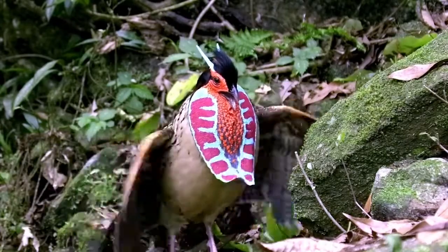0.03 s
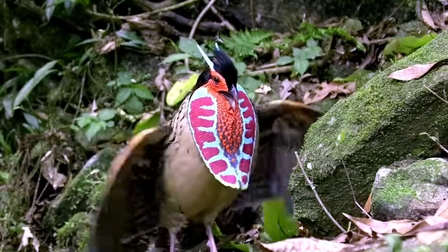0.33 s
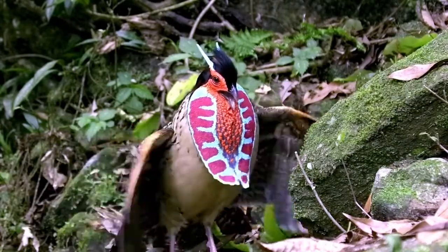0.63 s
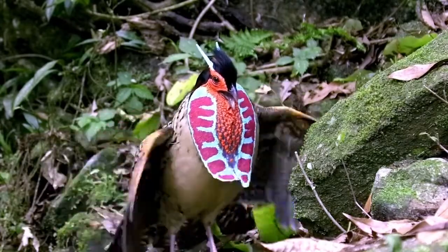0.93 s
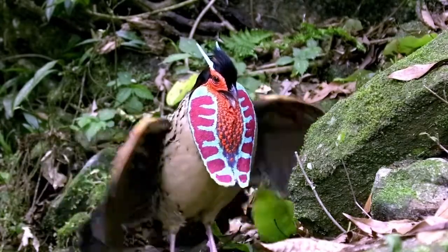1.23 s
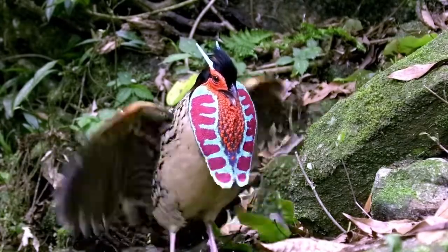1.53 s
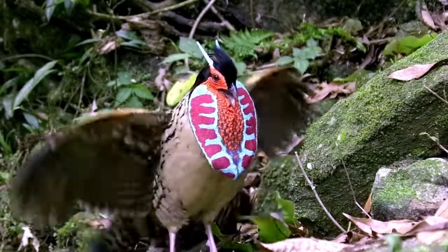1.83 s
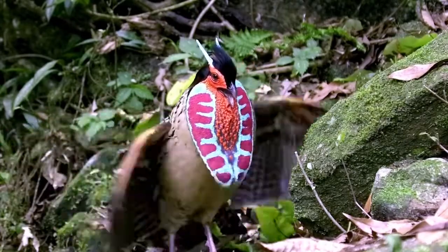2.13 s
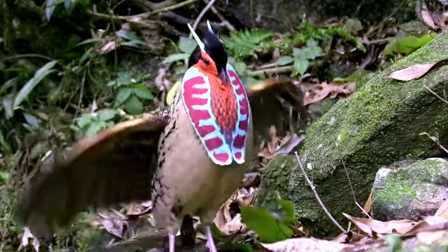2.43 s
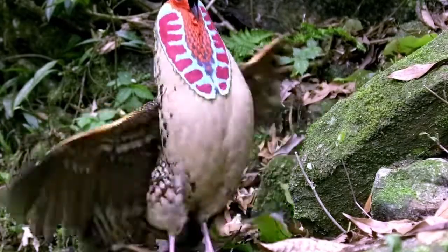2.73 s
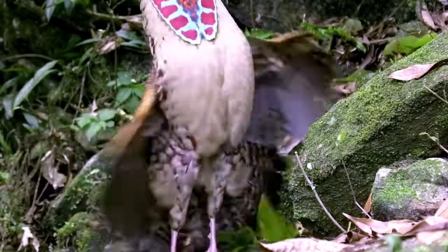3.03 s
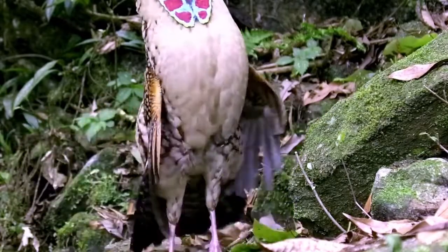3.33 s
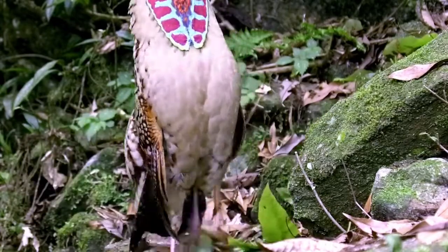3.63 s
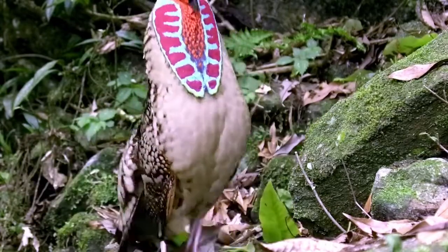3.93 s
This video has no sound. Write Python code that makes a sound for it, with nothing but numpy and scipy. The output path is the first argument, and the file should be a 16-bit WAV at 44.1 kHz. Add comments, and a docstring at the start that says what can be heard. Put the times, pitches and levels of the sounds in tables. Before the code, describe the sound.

Sharp clicks and wing beats from a displaying pheasant, followed by rustling and a hiss.

```python
"""A sharp click and a swishing, fluttering wing stroke sound close by: a pheasant is displaying.
Nine more beats follow, each led by a soft tick. Short bursts ringing its throat make the ticks and
clicks; feathers and puffs of air make the strokes. Then it rears up with shivering wings, hisses
and scuffs through dry leaves, while quills and twigs snap. Small birds call far off among the
trees, over quiet foliage and a low rumble of moving air."""
import sys
import numpy as np
from scipy import signal
from scipy.fft import rfft, irfft
from scipy.io import wavfile

SR = 44100
rng = np.random.default_rng(int(sys.argv[2]) if len(sys.argv) > 2 else 0)


def waveform_to_disk(signal):
    """Save audio, clipped to [-1, 1], as 16-bit WAV at the path in sys.argv[1]."""
    frames = np.transpose(np.atleast_2d(signal))
    scaled = np.clip(frames, -1, 1) * 32767
    samples = np.round(scaled).astype(np.int16)
    wavfile.write(sys.argv[1], SR, samples)


N = 176400
T = np.arange(N) / SR
FREQS = np.arange(N // 2 + 1) * SR / N + 1e-3

# The ten beats of the display (time [s], click level [dB], click rise [s], click fall [s],
# throat tuning [ratio], swish level [dB], flutter level [dB])
BEATS = [(.003, -9.5, 0.0049, 0.0076, 1.36, -2, -0.5), (0.3017, -0.5, 0.0025, 0.0036, 0.97, 0.5, 2.5),
         (.6003, 1, 0.0018, 0.0044, 0.99, 0.5, -0.5), (0.8764, -0.5, 0.004, 0.0032, 0.98, -2.5, -2.5),
         (1.1459, 0, 0.0018, 0.0067, 0.99, -2.5, -0.5), (1.3979, -0.5, 0.0022, 0.0064, 0.99, -3, -1),
         (1.639, -0.5, 0.0039, 0.0051, 1.017, -2.5, -2), (1.877, 2, 0.0027, 0.0026, 0.991, -2.5, 1.5),
         (2.1015, -0.5, 0.0028, 0.0044, 1.03, 0, 1), (2.3313, -4.5, 0.0053, 0.0068, 0.92, -2.5, 2.5)]
# Stereo width of close and of spread-out sounds (frequency [Hz], side compared with middle [dB])
NARROW = [(100, -67.5), (2200, -65), (4200, -14.5), (5600, -2.5), (7400, -2), (8400, -19), (11500, -12),
          (13500, -2.5)]
WIDE = [(100, -10.5), (1000, -16.5), (3000, -13.5), (6000, 0.5), (10000, -15.5), (14000, 0)]
BIRD_PAN_DB, LEAF_PAN_DB = -2, -0.9  # left minus right


def clicks():
    """Short rough bursts ring the throat: a dull tick within a faint scrape, then the sharp click."""
    # Soft ticks ahead of the clicks (time [s], level [dB])
    ticks = [(0.2537, -2), (0.554, -1), (.831, -1.5), (1.1015, -3.5), (1.355, 0.5), (1.594, 0), (1.833, -2),
             (2.061, -1), (2.291, -3)]
    burst = stereo(grains(16000, 1.0), NARROW, BIRD_PAN_DB)
    sharp = sum(undb(db) * shade(burst * swell(at, rise, fall), throat(tuning))
                for at, db, rise, fall, tuning, _, _ in BEATS)
    tick_level = sum(undb(db) * (swell(at, 0.0055, 0.0019) + undb(-9) * swell(at, 0.018, 0.018))
                     for at, db in ticks)
    tick_bursts = stereo(grains(5000, 1.2), NARROW, BIRD_PAN_DB) * tick_level
    dull = shade(tick_bursts, throat(0.95) * lowpass(6750, 4))
    direct = undb(-10.5) * sharp + undb(-23.5) * dull
    return direct + undb(-13) * tree_echo(direct.mean(0), fade_s=0.31)


def throat(tuning):
    """Gain per frequency of the throat, which rings at a few pitches, all multiplied by tuning."""
    # Pitches at which the throat rings (frequency [Hz], width [Hz], level [dB])
    resonances = [(1010, 680, -23.5), (2312, 430, -3.5), (3440, 230, -1), (4277, 330, 2.5), (5330, 300, -2),
                  (6470, 600, -3), (7540, 230, -1.5), (9940, 390, -1.5), (11900, 1000, -13.5)]
    f = FREQS / tuning
    return sum(undb(db) / (1 + ((f / hz - hz / f) * hz / width) ** 2) for hz, width, db in resonances)


def wing_strokes():
    """With every click the wings sweep down: a crackly swish, and a low flutter that slows."""
    # Tone of the swishing feathers (frequency [Hz], level [dB])
    swish_tone = [(240, -58), (400, -17.5), (586, -26.5), (683, -21.5), (942, -16.5), (1100, -14.5),
                  (1560, -18.5), (2430, -7), (2880, -9.5), (3300, -6), (4220, -5), (4700, -7.5), (7100, -4),
                  (9950, -2), (12700, -5), (14600, -2), (15500, -9)]
    flutter_hz, slowing_hz_per_s = 100.15, 260
    # The second swell keeps the swish from starting ahead of its click.
    swish = sum(undb(db) * swell(at + 0.008, 0.0091, 0.028, hold=0.0077) * swell(at, rise, 0.028, hold=1)
                for at, _, rise, *_, db, _ in BEATS)
    crackle = stereo(grains(14000, 1.5), NARROW, BIRD_PAN_DB)
    feathers = shade(crackle * swish * undb(1.3 * wander(150)), colour(swish_tone))
    starts = np.array(BEATS)[:, 0]
    since_beat = T - starts[np.maximum(np.searchsorted(starts, T) - 1, 0)]
    puff_hz = np.maximum(flutter_hz - slowing_hz_per_s * since_beat, flutter_hz / 2)
    push = sum(undb(db) * swell(at + 0.021, 0.017, 0.039) for at, *_, db in BEATS)
    air = undb(-31.5) * push * flutter(puff_hz, noise_share=0.7)
    return undb(-17) * feathers + air + undb(-11) * tree_echo(air.mean(0), fade_s=0.39)


def flutter(hz, noise_share):
    """Bending flight feathers let out uneven puffs of air, about hz times a second."""
    # Tone of the air pushed by the wings (frequency [Hz], level [dB])
    air_tone = [(25, 5), (60, -5.5), (90, 0), (125, 4), (175, 2.5), (250, -9), (350, -12.5), (500, -18.5),
                (800, -54), (2000, -60)]
    uneven_hz = hz * np.exp(0.0691 * wander(60))
    cycle = np.floor(np.cumsum(uneven_hz) / SR)
    puffs = np.diff(cycle, prepend=0) * undb(2 * wander(70))
    air = unit(puffs - puffs.mean()) + noise_share * stereo(white(), NARROW)
    return unit(shade(air, colour(air_tone)))


def rearing():
    """The wings shiver as the bird rises: feathers rustle, air rushes and buffets the microphone."""
    # Loudness as the bird rises (time [s], rustle [dB], rush [dB], shiver [dB])
    movement = [(2.4, -37.5, -58, -56), (2.462, -48, -56, -72), (2.59, -33.5, -42, -36.5),
                (2.62, -28, -41, -43), (2.674, -36.5, -48.5, -44.5), (2.786, -36, -38, -39),
                (2.84, -27.5, -34.5, -29.5), (2.89, -30.5, -35, -40), (2.978, -27.5, -33.5, -31.5),
                (2.996, -27, -22, -36), (3.026, -19, -29.5, -25.5), (3.064, -26.5, -31, -34.5),
                (3.134, -24.5, -32, -26), (3.158, -19, -23, -29.5), (3.174, -23.5, -35, -30),
                (3.34, -29.5, -38, -37.5), (3.404, -34.5, -51, -93), (3.42, -33.5, -62, -69)]
    # Tones of the rustling feathers and the rushing air (frequency [Hz], level [dB])
    rustle_tone = [(880, -32), (1500, -1), (1820, -7.5), (2590, 2), (3000, -5), (4230, -2.5), (4940, -5),
                   (6370, -6.5), (7600, -6), (8210, -8), (13100, -8.5), (15100, -10.5), (15500, -27)]
    rush_tone = [(150, -11.5), (300, 5.5), (600, -4), (950, 3.5), (1400, -2.5), (2200, -33), (5000, -23.5)]
    times, *levels = np.array(movement).T
    fade = swell(times[0], 0.06, 0.023, hold=times[-1] - times[0])
    rustle, rush, shiver = (fade * undb(np.interp(T, times, db)) for db in levels)
    crackle = stereo(grains(9000, 1.1), NARROW, pan_db=-1.5) * rustle * undb(0.71 * wander(82))
    feathers = shade(crackle, colour(rustle_tone) * highpass(1300, 4))
    air = shade(stereo(white(), NARROW) * rush, colour(rush_tone) * highpass(120, 2))
    buffet = undb(2) * shade(stereo(white(), WIDE), lowpass(27, 4))
    feathers = undb(1.5) * rock_echo(feathers)
    puffs = undb(-1) * flutter(hz=79.4, noise_share=1.0)
    return feathers + air + shiver * (puffs + buffet)


def hiss():
    """A long hiss with a steady tone grows while the bird stands tall."""
    # Loudness of the hiss (time [s], level [dB])
    loudness = [(2.5, -69.5), (2.75, -40), (3.0, -54), (3.25, -46), (3.42, -30.5), (3.6, -29.5), (3.7, -24),
                (3.82, -23), (4, -23.5)]
    # Tone of the hiss (frequency [Hz], level [dB])
    hiss_tone = [(350, -31.5), (600, -21.5), (678, -19.5), (902, -10), (1220, -17), (1390, -15),
                 (1510, -15), (1830, -6.5), (2250, -8), (2470, 1.5), (2570, 1), (3030, -12), (3610, 2.5),
                 (3920, -6.5), (4310, -3.5), (4750, -10.5), (5080, -12.5), (5660, -10), (6150, -5.5),
                 (7640, -11), (8180, -18), (9500, -9.5), (11000, -20.5), (14300, -18), (15500, -25)]
    times, db = np.array(loudness).T
    fade_in = np.clip((T - times[0]) / 0.079, 0, 1)
    level = undb(np.interp(T, times, db) + 0.5 * wander(25.17)) * fade_in
    return level * rock_echo(shade(stereo(white(), WIDE, pan_db=-7), colour(hiss_tone)))


def scuffs():
    """Feet and tail drag through dry leaves in crackling bursts."""
    # Drags through the leaves (time [s], level [dB], rise [s], fall [s])
    drags = [(3.732, -17, 0.034, 0.074), (3.764, -22.5, 0.02, 0.012), (3.9, -13.5, 0.027, 0.043),
             (3.976, -23, 0.032, 0.091)]
    # Tone of dry leaves (frequency [Hz], level [dB])
    leaf_tone = [(240, -33), (400, -14), (738, -15.5), (1030, -9), (1150, -12), (1490, -8.5), (1660, -9.5),
                 (2430, -1), (3010, -3.5), (4290, -3.5), (5390, -4.5), (9650, -5.5), (14100, -6),
                 (15500, -10)]
    level = sum(undb(db) * swell(at, rise, fall) for at, db, rise, fall in drags)
    return shade(stereo(grains(9000, 1.4), WIDE, LEAF_PAN_DB) * level, colour(leaf_tone))


def snaps():
    """Quills flick and dry twigs crack as the bird moves."""
    # Single snaps (time [s], level [dB])
    cracks = [(2.582, -21.5), (2.616, -25.5), (2.957, -21), (3.028, -22), (3.1, -31), (3.156, -19),
              (3.76, -9.5), (3.7666, -9.5), (3.901, -13)]
    # Tone of a snap (frequency [Hz], level [dB])
    snap_tone = [(200, -10.5), (600, -6.5), (1000, 2.5), (1600, -2.5), (2500, 3.5), (6000, -1.5),
                 (10000, -17), (15500, -17)]
    level = sum(undb(db) * swell(at, 0.001, 0.002) for at, db in cracks)
    return shade(stereo(grains(12000, 3.6), NARROW, LEAF_PAN_DB) * level, colour(snap_tone))


def far_birds():
    """Small birds call far off: a fast pitch wobble makes them hoarse, and the forest blurs them."""
    # Calls (time [s], length [s], start pitch [Hz], end pitch [Hz], wobble [share of pitch],
    # level [dB], direct sound compared with echo [dB])
    calls = [(0.776, 0.11, 3800, 3700, 0.059, -30.5, -17), (0.891, 0.053, 1031, 678, 0.0652, -31.5, 1.5),
             (0.946, 0.072, 3600, 3714, 0.15, -32.5, -6), (1.514, 0.13, 3750, 3750, 0.084, -29.5, -12),
             (1.894, .16, 3610, 3667, 0.067, -29, -4), (2.22, 0.097, 2473, 2464, 0.036, -24, -9),
             (2.399, 0.092, 2940, 3190, 0.11, -24.5, -5), (2.517, 0.108, 3716, 3793, 0.074, -25.5, -8)]
    direct, scattered = 0, 0
    wobble = wander(421.5)
    for at, length, start_hz, end_hz, share, db, direct_db in calls:
        progress = np.clip((T - at) / length, 0, 1)
        hz = (start_hz + (end_hz - start_hz) * progress) * (1 + share * wobble)
        level = undb(db) * np.sqrt(abs(np.sin(np.pi * progress)))
        call = level * np.sin(2 * np.pi * np.cumsum(hz) / SR)
        direct += undb(direct_db) * call
        scattered += call
    return direct + tree_echo(scattered, fade_s=0.64)


def forest():
    """Foliage rustles quietly over a low rumble of moving air."""
    # Tone of the foliage (frequency [Hz], level [dB])
    foliage_tone = [(180, -9), (300, 1.5), (411, -4), (708, -5.5), (794, -8), (1490, -3.5), (1750, -8),
                    (4960, -10), (11500, -9.5), (15500, -10)]
    foliage = undb(-48.5 + wander(2.65)) * shade(stereo(white(), WIDE), colour(foliage_tone))
    rumble = undb(-47.5) * shade(stereo(white(), WIDE), lowpass(34.7, 2))
    return foliage + rumble


def tree_echo(x, fade_s):
    """Trunks and ground scatter the sound into an echo that drops 60 dB in fade_s seconds."""
    decay = undb(np.maximum(-60 * T / fade_s, -200))
    tail = (stereo(white(), WIDE) * decay)[:, :SR]
    tail /= np.sqrt(np.sum(tail ** 2) / 2)
    return signal.fftconvolve(np.atleast_2d(x), tail, axes=1)[:, :N]


def rock_echo(x):
    """Quick echoes from the ground and boulders mix with the sound and change its tone."""
    fade_s, echo_gain = 0.045, undb(-4)
    age = T[T < 0.1]
    tail = rng.standard_normal(len(age)) * undb(-60 * age / fade_s)
    echoes = signal.fftconvolve(x, tail[None] / np.linalg.norm(tail), axes=1)[:, :N]
    return (x + echo_gain * echoes) / np.hypot(1, echo_gain)


def undb(db):
    """Turn decibels into a gain to multiply by."""
    return np.exp(np.asarray(db) * np.log(10) / 20)


def unit(x):
    """Scale a signal to an average power of 1."""
    return x / np.sqrt(np.mean(x ** 2))


def colour(points):
    """Join (frequency [Hz], level [dB]) points into a gain at every frequency."""
    hz, db = np.array(points, float).T
    return undb(np.interp(np.log(FREQS), np.log(hz), db))


def lowpass(hz, steepness):
    """Gains that turn down frequencies above hz."""
    return 1 / (1 + (FREQS / hz) ** steepness)


def highpass(hz, steepness):
    """Gains that turn down frequencies below hz."""
    return 1 / (1 + (hz / FREQS) ** steepness)


def shade(x, gain):
    """Filter by a gain per frequency, scaled so that white noise keeps its power."""
    return irfft(rfft(x) * gain / np.sqrt(np.mean(abs(gain) ** 2)), N)


def stereo(pair, width, pan_db=0):
    """Mix two unrelated signals into left and right, which sound alike where the width is small."""
    spread = colour(width)
    middle, side = rfft(pair) / np.sqrt(1 + spread ** 2)
    left_right = irfft(np.array([middle + spread * side, middle - spread * side]), N)
    return left_right * undb(np.array([[pan_db], [-pan_db]]) / 2)


def white():
    """Two unrelated white noises."""
    return rng.standard_normal((2, N))


def grains(rate, spread_db):
    """A crackle of tiny snaps of unequal size, about rate of them a second."""
    hits = rng.random(N) < rate / SR
    return unit(white() * hits * undb(spread_db * np.minimum(rng.exponential(size=N), 2 * np.pi)))


def wander(rate):
    """A random drift of roughly plus or minus 1, heading for a new value rate times a second."""
    return np.interp(T * rate, np.arange(8192), rng.standard_normal(8192)) * np.sqrt(3 / 2)


def swell(at, rise, fall, hold=0):
    """A level that rises in a bell curve to 1 at time at, holds, then dies away (all in seconds)."""
    before = (np.minimum(T - at, 0) / rise) ** 2
    after = np.maximum(T - at - hold, 0) / fall
    return np.exp(-np.minimum(before + after, 50))


def scene():
    """The pheasant's display in its forest."""
    return clicks() + wing_strokes() + rearing() + hiss() + scuffs() + snaps() + far_birds() + forest()


def record(dry):
    """Two slightly unlike microphones; the recorder sits off zero, clips and cuts the highest treble."""
    # How the microphones differ (frequency [Hz], right minus left [dB])
    mic_balance = [(200, -1), (4000, -1.64), (5300, 1), (6600, -1.5), (11800, -1.5), (13200, 3.5),
                   (15500, 2)]
    offset, top_hz = -0.0287, 15700
    tilt = np.sqrt(colour(mic_balance))
    heard = irfft(rfft(dry) * np.array([1 / tilt, tilt]), N)
    treble_cut = signal.ellip(10, 0.2, 80, top_hz, fs=SR, output="sos")
    return signal.sosfilt(treble_cut, np.clip(heard + offset, -1, 1))


dry = scene()
out = record(dry)
waveform_to_disk(out)
```